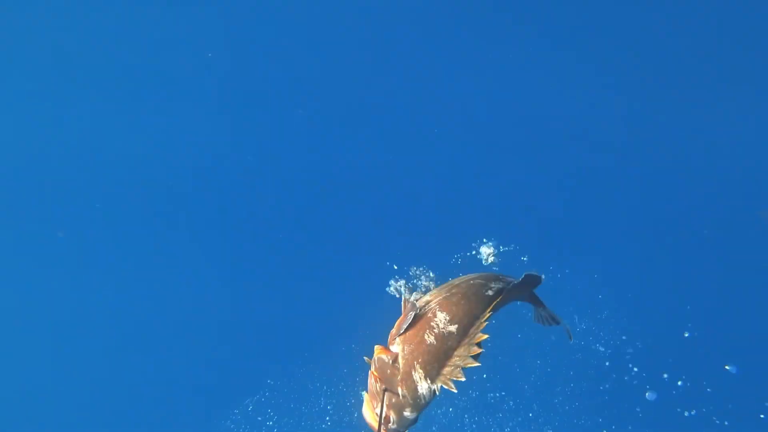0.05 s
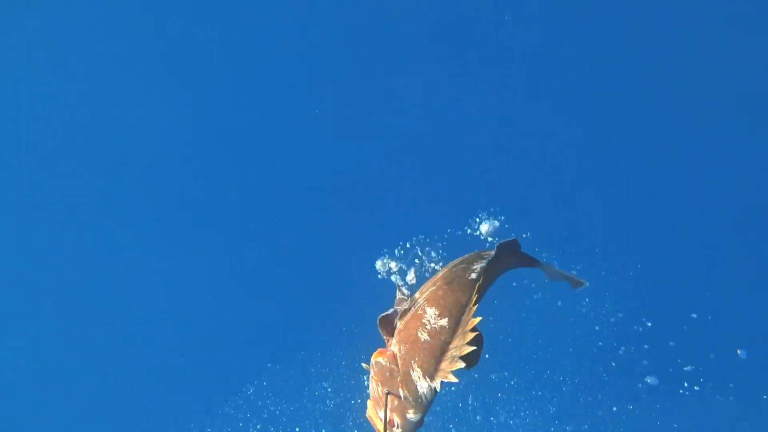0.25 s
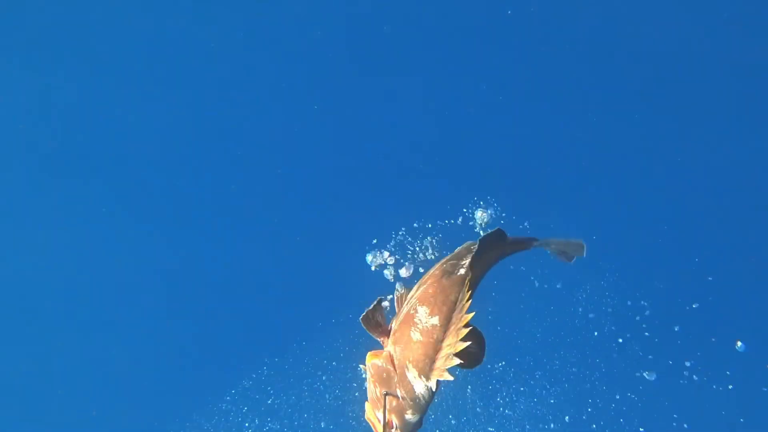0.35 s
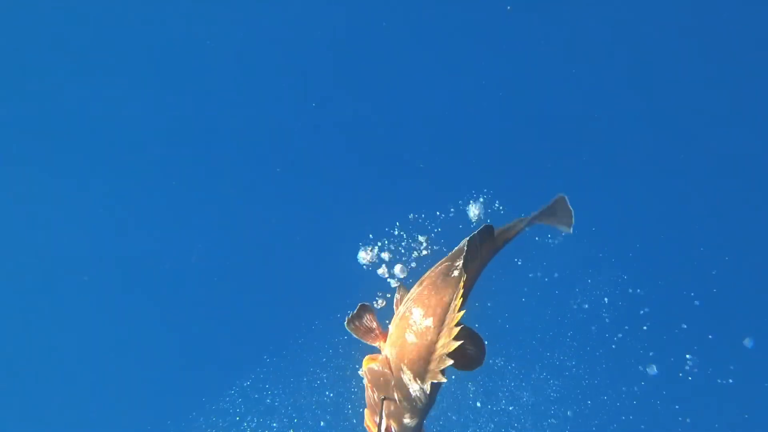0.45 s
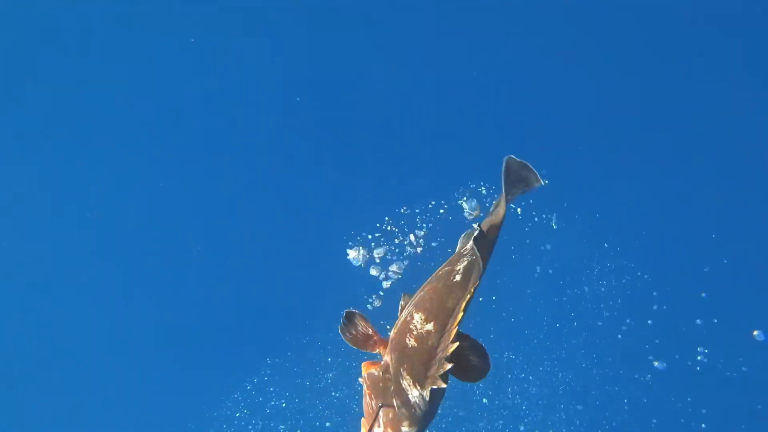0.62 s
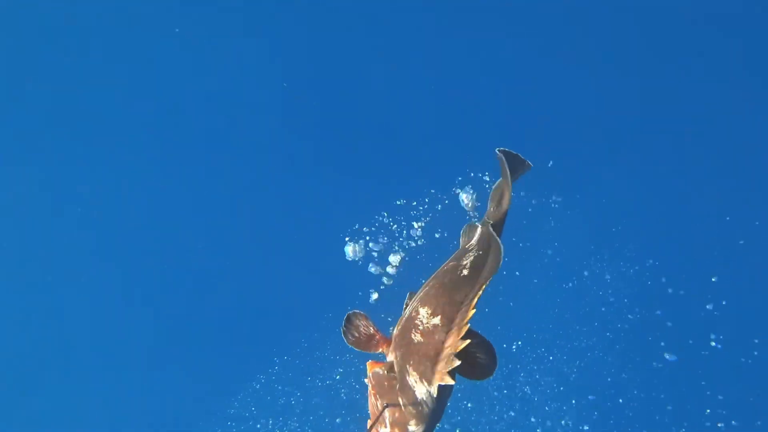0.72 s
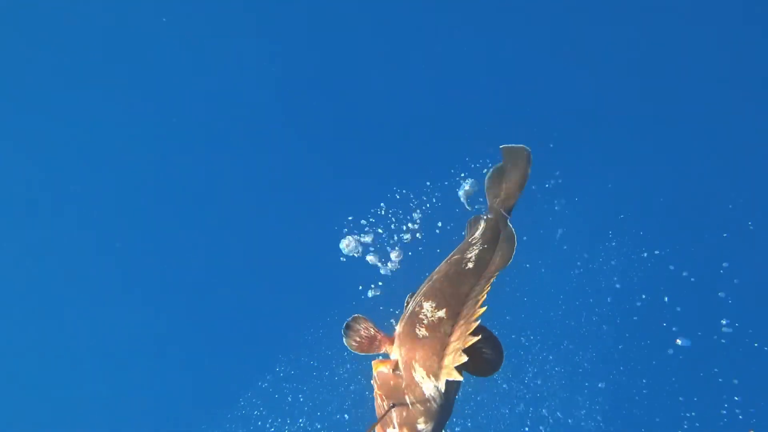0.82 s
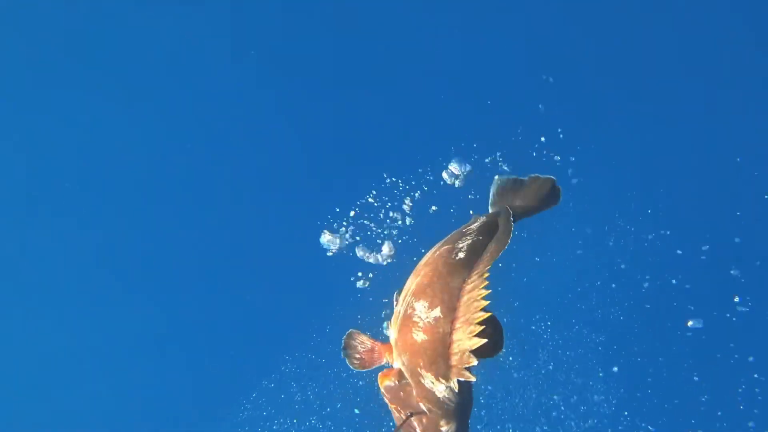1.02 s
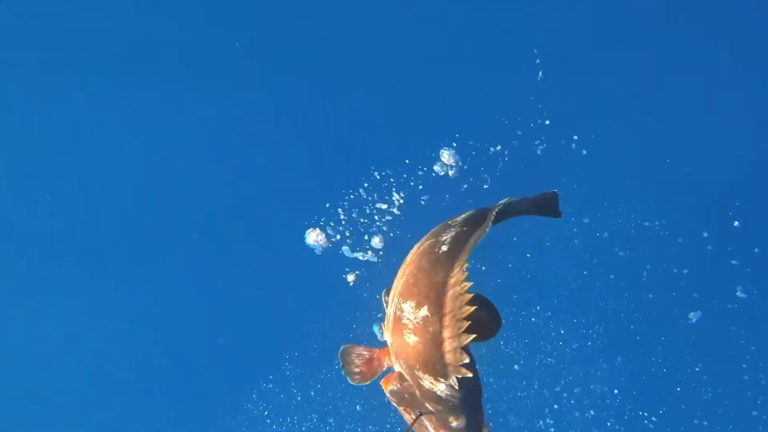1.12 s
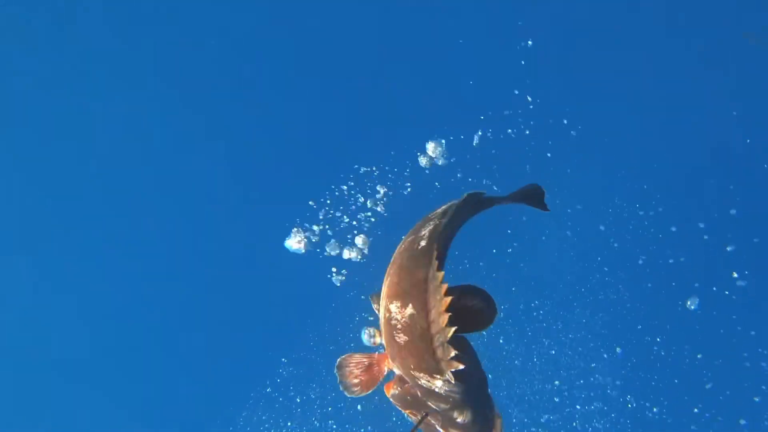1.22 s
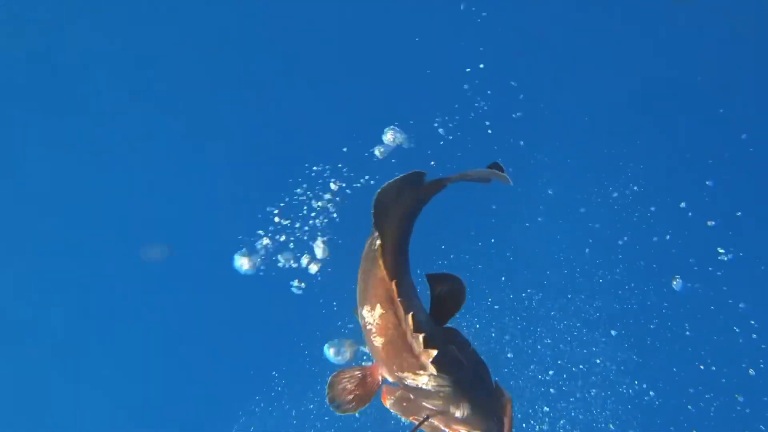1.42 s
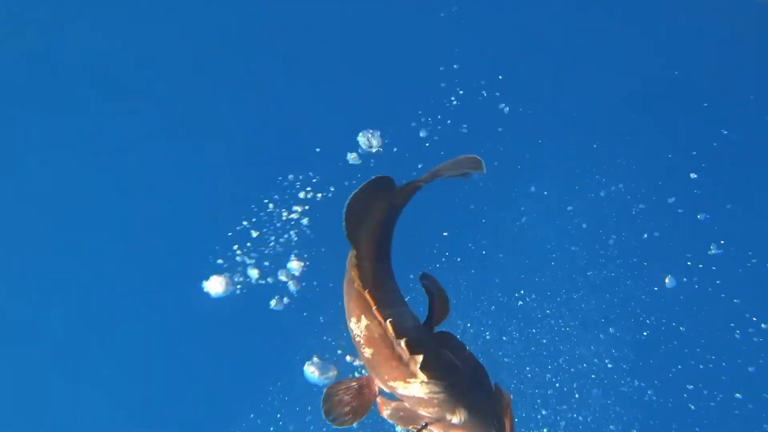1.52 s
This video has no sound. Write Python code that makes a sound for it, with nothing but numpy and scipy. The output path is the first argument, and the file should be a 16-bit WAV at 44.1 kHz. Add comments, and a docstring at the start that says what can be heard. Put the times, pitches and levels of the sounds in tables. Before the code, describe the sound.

A big fish thrashes underwater close to the microphone: two quick muffled thuds, the second louder, with a rattle and a brief hollow ring of gear. Low water rumble, a steady wash and faint clicks continue.

```python
"""A big fish thrashes under water, close to a camera in its housing: two muffled thuds, the second with
a rattle and a hollow ring of the gear. The thuds are short pressure pulses in the water; the ring and
the rattle are damped vibrations of the gear. A few bubbles pulsate, the housing pings faintly once,
and tiny clicks snap far off. Behind them lie the rumble of moving water, a steady wash coloured by the
housing's resonances, and a faint fizz, all heard through the housing's two microphone ports."""
import sys
import numpy as np
from scipy import signal
from scipy.fft import rfft, irfft, next_fast_len
from scipy.io import wavfile

SR = 44100
rng = np.random.default_rng(int(sys.argv[2]) if len(sys.argv) > 2 else 0)


def unload_wav(signal):
    """Save mono or channel-first audio to the path in sys.argv[1] as 16-bit WAV at rate SR, clipped to [-1, 1]."""
    wavfile.write(
        sys.argv[1],
        SR,
        np.round(np.clip(np.atleast_2d(signal).T, -1, 1) * 32767).astype(np.int16),
    )


N = 68355
TIME = np.arange(N) / SR
FFT_SIZE = next_fast_len(N + 8192)
FREQS = np.maximum(np.arange(FFT_SIZE // 2 + 1) * SR / FFT_SIZE, 1)

# Levels in the tables are relative. Pushes of the fish on the water: t/s, f/Hz, level/dB, rise/s
FISH_PULSES = [(0.214, 148, -35, 0.0042), (0.2264, 108.3, -29.5, 0.012), (0.2263, 225.2, -35.5, 0.0096),
               (0.318, 185, -38, 0.0061), (0.3424, 181, -27.5, 0.0082), (0.3840, 148, -25.5, 0.0039),
               (0.403, 167, -41, 0.0093), (0.669, 156, -48, 0.0037), (0.928, 122, -43.5, 0.0029),
               (1.512, 96, -43.5, 0.0037)]
# Hollow tones of the gear: t/s, f/Hz, level/dB, rise/s, hold/s
GEAR_TONES = [(0.2233, 409, -33.5, 0.0082, 0.0032), (0.322, 395, -35.5, 0.0019, 0.0012),
              (0.34, 390, -36, 0.0016, 0.001), (0.3434, 392, -23.5, 0.0044, 0.003),
              (0.359, 418, -24, 0.0036, 0.01), (0.374, 392, -28, 0.0041, 0.0093),
              (0.393, 348, -47, 0.011, 0.0061), (0.418, 408, -44, 0.005, 0.0023)]
# Knocks of the gear: t/s, dull level/dB, sharp level/dB
GEAR_CONTACTS = [(0.197, -42, -62), (0.222, -38.5, -64), (0.2338, -33.5, -57), (0.2414, -33.5, -62),
                 (0.249, -42.5, -47), (0.323, -35, -47.5), (0.3394, -33, -32.5), (0.3458, -22, -31.5),
                 (0.3489, -36, -34.5), (0.3525, -32.5, -40), (0.360, -31, -35), (0.3726, -28.5, -44),
                 (0.3825, -30, -56), (0.389, -42, -50), (0.424, -51, -74), (0.673, -50, -55)]
# Dull and sharp normal modes of the gear: f/Hz, level/dB, T60/s
GEAR_DULL_MODES = [(215, -9, 0.047), (350, -10, 0.066), (447, 0, 0.046), (539, -4, 0.039), (610, -6, 0.049),
                   (733, -6.5, 0.066), (849, -3.5, 0.053), (1105, -18, 0.028), (1190, -16, 0.032)]
GEAR_SHARP_MODES = [(1040, -10, 0.015), (1176, 5, 0.025), (1390, 0, 0.019), (1553, -4, 0.024),
                    (1667, 0.5, 0.033), (1890, -2.5, 0.02), (2010, -0.5, 0.032), (2285, -4.5, 0.01),
                    (2742, -9.5, 0.028), (3020, -43, 0.009)]
# Short pings, five pulsating bubbles and one faint high ring of the housing: t/s, f/Hz, level/dB, rise/s
PINGS = [(0.042, 811, -40, 0.01), (0.046, 665, -45, 0.007), (0.238, 871, -48.5, 0.0095),
         (0.826, 668.5, -46, 0.0063), (0.890, 826, -48.5, 0.0085), (0.897, 1990, -55, .005)]
# Distant snaps: t/s, f/Hz, level/dB, T60/s
FAR_CLICKS = [(0.072, 6600, -57, 0.0085), (0.1052, 6160, -53.5, 0.012), (0.5254, 4480, -53, 0.0023),
              (0.8745, 3440, -58.5, 0.017), (0.875, 6230, -57.5, 0.018), (0.9675, 6400, -51, 0.0077),
              (1.099, 6100, -58, 0.011), (1.3644, 6670, -42.5, 0.0045)]
# Spectra of the slow pressure swings and of the eddies: f/Hz, level/dB
RUMBLE_SPECTRUM = [(12, 0), (25, 2.5), (45, -5.5), (70, -10.5), (100, -8), (135, -23), (200, -28.5),
                   (320, -41), (600, -58)]
EDDY_SPECTRUM = [(60, -45), (105, -5.5), (150, -5), (210, -11), (320, -16), (600, -49.5)]
# Their envelopes: t/s, level/dB
RUMBLE_ENVELOPE = [(0, -48.5), (0.17, -56), (0.22, -43.5), (0.45, -45), (0.57, -56), (0.68, -46.5),
                   (0.85, -48), (1.05, -50.5), (1.16, -47), (1.25, -49), (1.38, -52.5), (1.55, -47.5)]
EDDY_ENVELOPE = [(0, -50.5), (0.15, -59), (0.3, -59), (0.5, -74.5), (1.3, -73), (1.55, -65.5)]
# Spectra of the wash, in phase and in antiphase at the two ports: f/Hz, level/dB
IN_PHASE_SPECTRUM = [(110, -37), (180, -20), (221, -6), (282, -6), (570, -10), (654, -6), (738, -9),
                     (847, -1), (1170, -10), (2040, -9.5), (2500, -18), (6450, -24), (11000, -27.5),
                     (14300, -100), (22000, -120)]
ANTIPHASE_SPECTRUM = [(35, -52), (60, -16), (101, -12), (123, -26.5), (153, -9.5), (520, -5.5), (619, -8.5),
                      (753, -7.5), (1090, -7.5), (1220, -14), (2010, -6.5), (2550, -16), (5130, -25.5),
                      (6960, -27), (11000, -35), (14300, -82), (22000, -120)]
# Resonances of the housing: f/Hz, half-width/Hz, level/dB, phase lead of the left/rad
HOUSING_RESONANCES = [(660, 61, -65.5, 2.78), (794, 72, -74.5, 1.32), (1065, 73, -60, 2.8),
                      (1405, 122, -65.5, 2.1), (2032, 43.6, -66.5, 1.965)]
# Left port relative to right: f/Hz, level/dB, phase lead/rad
PORT_DIFFERENCES = [(38.7, -0.5, 0.013), (111, -0.5, 0.38), (185, 1, 0.78), (400, -5.5, 2.01),
                    (615, -9, 2.15), (1140, 2.5, 2.35), (2260, 2.5, 2.62), (2900, -8.5, 0.7),
                    (7000, 1, 1.82), (9000, 0, 0.18)]


def fish_thuds():
    """Radiation by displacement: each jerk of the fish shoves the water for a few cycles."""
    return sum(pulsation(*pulse, steepness=1.78) for pulse in FISH_PULSES)


def gear_ring(t60_s=0.021, sag_per_s=2.05, waver_depth=0.015):
    """Forced vibration, then damping: the gear rings while pulled, its pitch sags, the water stills it."""
    waver = waver_depth * noise(1 / (1 + (FREQS / 160) ** 2))
    out = 0
    for onset, hz, db, rise, hold in GEAR_TONES:
        age = np.maximum(TIME - onset, 0)
        envelope = np.minimum(age / rise, 1) * decay(np.maximum(age - rise - hold, 0), t60_s)
        pitch = hz * np.exp(waver - sag_per_s * age) * (age > 0)
        out += from_db(db) * envelope * np.sin(2 * np.pi * np.cumsum(pitch) / SR)
    return out


def gear_rattle(rub_decay_s=0.0053, rub_gain=0.26, grains_per_s=3100):
    """Modal excitation: each contact, an impulse and a gritty rub, drives the modes of the gear."""
    out = 0
    for bank, modes in enumerate((GEAR_DULL_MODES, GEAR_SHARP_MODES)):
        force = np.zeros(N)
        for onset, *bank_db in GEAR_CONTACTS:
            rub_envelope = (TIME > onset) * np.exp(-np.abs(TIME - onset) / rub_decay_s)
            contact = rub_gain * rub_envelope * random_impulses(grains_per_s, N)
            contact[int(onset * SR)] += 1
            force += from_db(bank_db[bank]) * contact
        for i, (hz, db, t60) in enumerate(modes):
            out += (-1) ** i * from_db(db) * resonator(force, hz, t60) / np.sqrt(len(modes))
    return out


def pings():
    """Resonance: five bubbles pulsate and the housing rings once, each tone swelling and dying away."""
    return sum(pulsation(*ping, glide_per_s=0.1) for ping in PINGS)


def far_clicks(crack_gain=0.22, crack_above_hz=2300):
    """Transient response: each snap is a bright crack of noise and a quickly damped tone."""
    crack = crack_gain * noise(1 / (1 + (crack_above_hz / FREQS) ** 4))
    out = 0
    for onset, hz, db, t60 in FAR_CLICKS:
        age = np.maximum(TIME - onset, 0)
        envelope = from_db(db) * (age > 0) * decay(age, t60)
        out += envelope * (np.sin(2 * np.pi * hz * age) + crack)
    return out


def moving_water():
    """Flow noise: slow pressure swings and eddies around the housing swell and fade."""
    rumble = noise(from_db(over_hz(RUMBLE_SPECTRUM)) * (FREQS > 8))
    eddies = noise(from_db(over_hz(EDDY_SPECTRUM)))
    return gain_over_time(RUMBLE_ENVELOPE) * rumble + gain_over_time(EDDY_ENVELOPE) * eddies


def sea_wash(in_phase_db=-64, antiphase_db=-60.5):
    """Resonance under broadband drive: narrow bands of the housing stand out of steady sea noise."""
    in_phase = from_db(in_phase_db) * noise(from_db(over_hz(IN_PHASE_SPECTRUM)))
    antiphase = from_db(antiphase_db) * noise(from_db(over_hz(ANTIPHASE_SPECTRUM)))
    out = np.array([in_phase + antiphase, in_phase - antiphase])
    for hz, half_width, db, lead in HOUSING_RESONANCES:
        peak = resonance(hz, half_width)
        out += from_db(db) * noise(np.array([peak, peak * np.exp(-1j * lead)]))
    return out


def fizz(pops_per_s=250, db=-78.5):
    """Shot noise: the random pops of fine bubbles blur into a faint sizzle."""
    pops = random_impulses(pops_per_s, (2, N))
    return from_db(db) * unit_rms(filtered(pops, resonance(hz=6960, half_width_hz=700)))


def through_ports(pressure):
    """Transfer function: the housing gives its two ports different levels and phases."""
    half_lead = over_hz(PORT_DIFFERENCES, column=2) / 2
    left = from_db(over_hz(PORT_DIFFERENCES) / 2) * np.exp(1j * half_lead)
    return filtered(pressure, np.array([left, 1 / left]))


def pulsation(onset, hz, db, rise, glide_per_s=0, steepness=1):
    """A transient oscillation that peaks after its rise time and dies away."""
    age = np.maximum(TIME - onset, 0)
    envelope = (age / rise * np.exp(1 - age / rise)) ** steepness
    return from_db(db) * envelope * np.sin(2 * np.pi * hz * age * (1 + glide_per_s * age / 2))


def resonator(force, hz, t60):
    """A damped harmonic oscillator: a unit impulse starts a sine of amplitude 1."""
    radius, angle = decay(1 / SR, t60), 2 * np.pi * hz / SR
    return signal.lfilter([0, np.sin(angle)], [1, -2 * radius * np.cos(angle), radius ** 2], force + 1e-18)


def resonance(hz, half_width_hz):
    """A resonance peak, 6 dB down at one half-width from its centre."""
    return 1 / (1 + 1j * (FREQS - hz) / half_width_hz) ** 2


def decay(age, t60):
    """Exponential damping by 60 dB in each t60."""
    return from_db(-60 * age / t60)


def random_impulses(per_s, shape):
    """A Poisson train of impulses with Gaussian strengths."""
    return rng.standard_normal(shape) * (rng.random(shape) < per_s / SR)


def noise(response):
    """Filtered Gaussian noise of unit power."""
    return unit_rms(filtered(rng.standard_normal(FFT_SIZE), response))


def filtered(x, response):
    """Linear filtering: the spectrum times a frequency response."""
    return irfft(rfft(x, FFT_SIZE) * response, FFT_SIZE)[..., :N]


def over_hz(rows, column=1):
    """A table column interpolated over log frequency."""
    rows = np.array(rows)
    return np.interp(np.log(FREQS), np.log(rows[:, 0]), rows[:, column])


def gain_over_time(rows):
    """An amplitude envelope through points of t/s, level/dB."""
    return from_db(np.interp(TIME, *np.transpose(rows)))


def unit_rms(x):
    """Normalisation to unit power."""
    return x / np.sqrt(np.mean(x ** 2) + 1e-20)


def from_db(db):
    """Level to amplitude ratio."""
    return 10 ** (np.asarray(db) / 20)


def scene():
    """Superposition: events and flow noise pass through the ports and join the wash and the fizz."""
    pressure = fish_thuds() + gear_ring() + gear_rattle() + pings() + far_clicks() + moving_water()
    return through_ports(pressure) + sea_wash() + fizz()


def record(dry):
    """Band limiting: a steep low-pass removes the highest treble."""
    cutoff_hz = 11150
    return filtered(dry, 1 / np.sqrt(1 + (FREQS / cutoff_hz) ** 300))


dry = scene()
out = record(dry)
unload_wav(out)
```